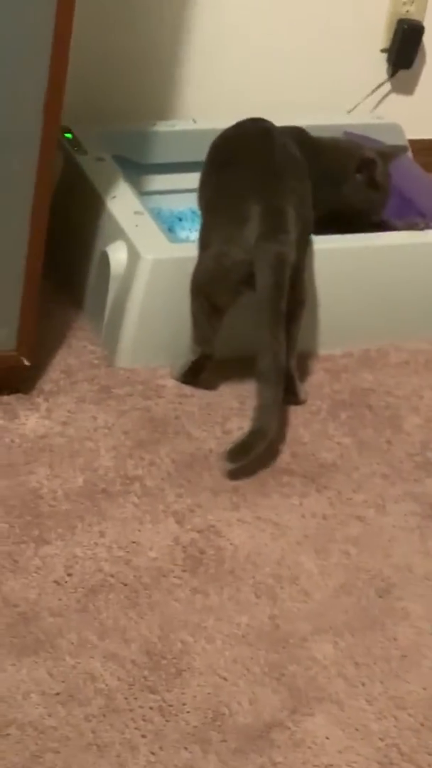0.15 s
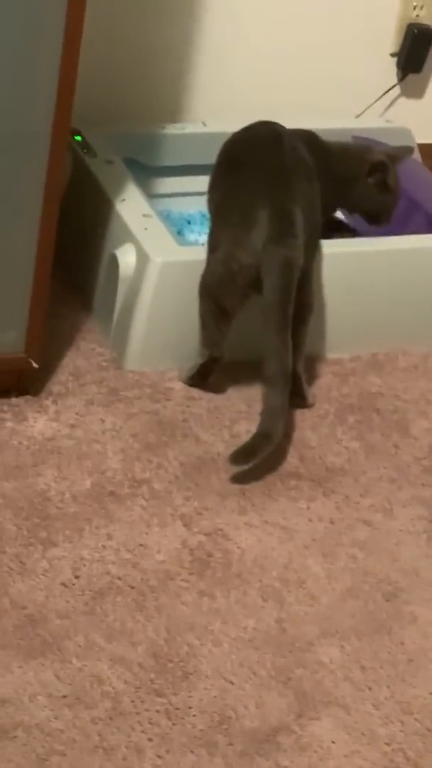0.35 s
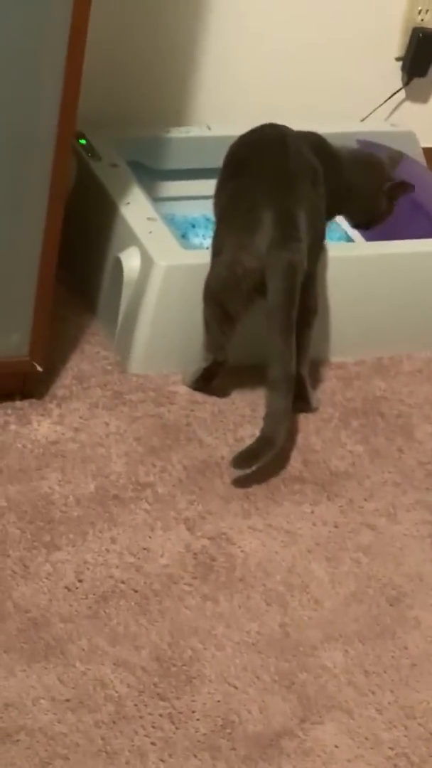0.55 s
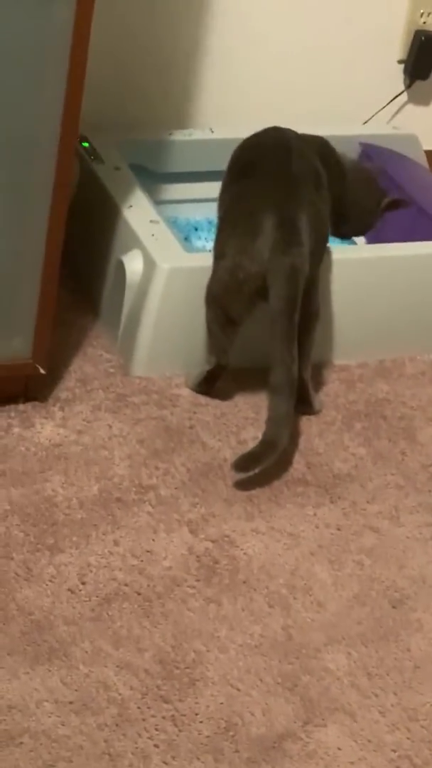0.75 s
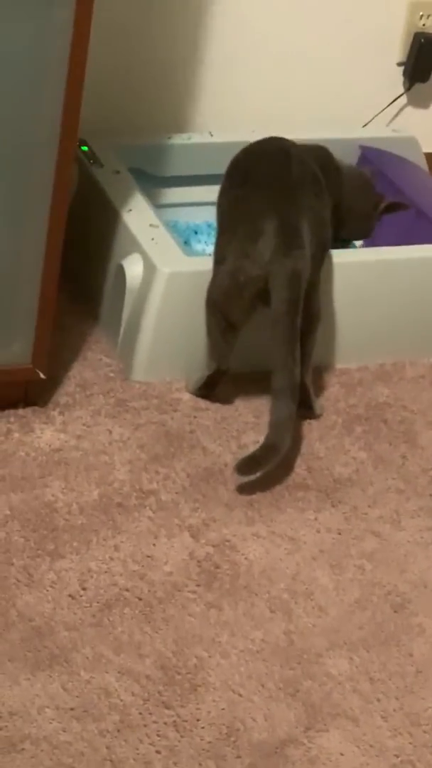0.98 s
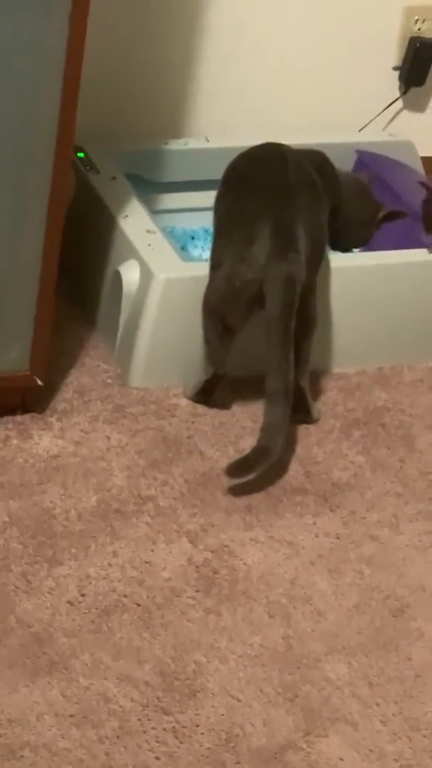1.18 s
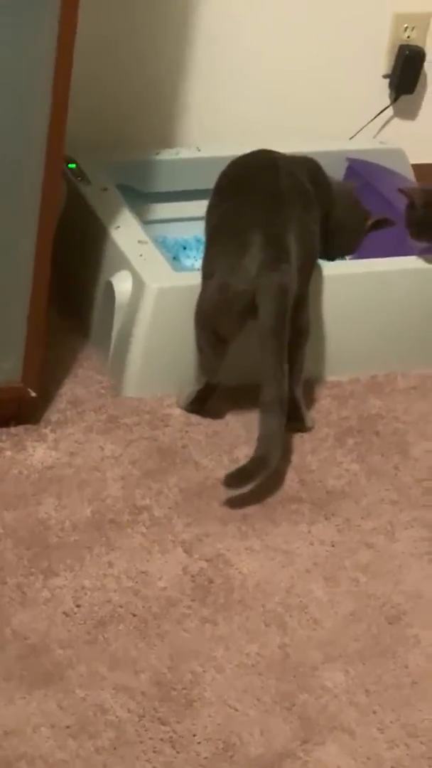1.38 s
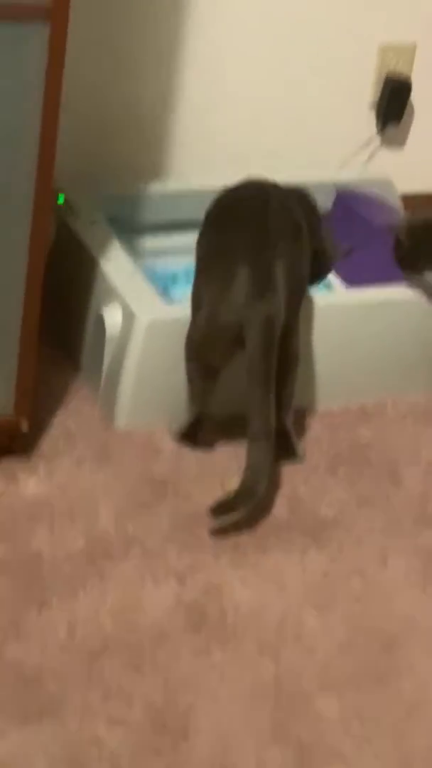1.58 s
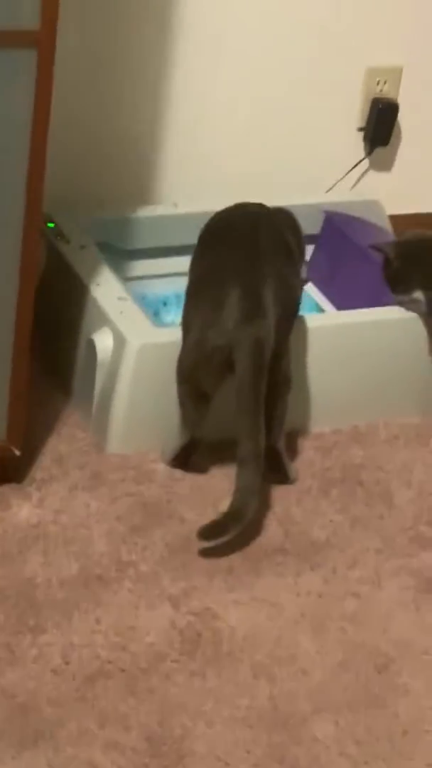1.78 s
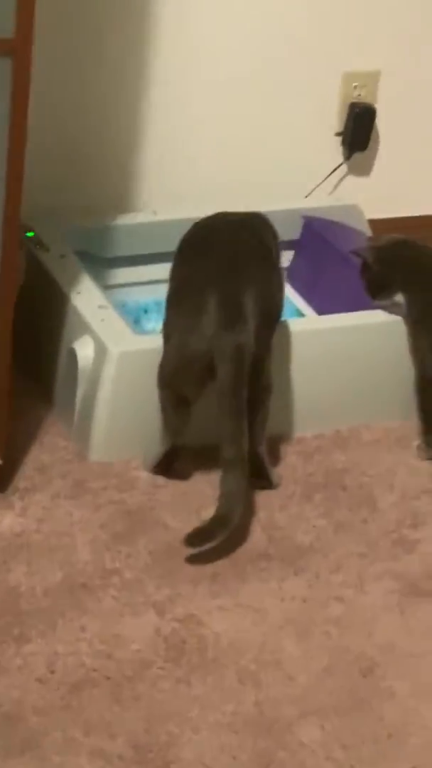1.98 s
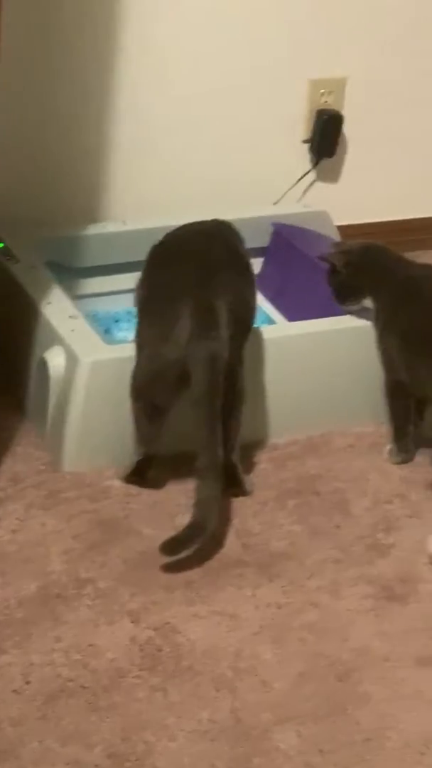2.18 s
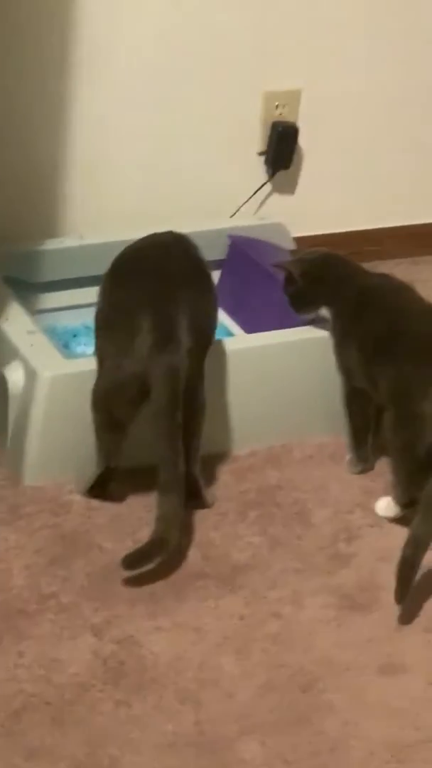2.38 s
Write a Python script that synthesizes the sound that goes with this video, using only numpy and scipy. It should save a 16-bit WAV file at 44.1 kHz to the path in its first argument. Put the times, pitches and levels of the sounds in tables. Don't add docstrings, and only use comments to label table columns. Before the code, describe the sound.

A cat's paw rakes crunchy crystal litter in a plastic tray, two bursts over low appliance hum

```python
import sys
import numpy as np
from scipy import signal
from scipy.fft import rfft, irfft, next_fast_len
from scipy.io import wavfile
from scipy.ndimage import uniform_filter1d

SR = 44100
rng = np.random.default_rng(int(sys.argv[2]) if len(sys.argv) > 2 else 0)


def transcribe(signal):
    frames = np.atleast_2d(signal).T
    limited = np.clip(frames, -1, 1)
    pcm = np.round(limited * 32767).astype(np.int16)
    wavfile.write(sys.argv[1], SR, pcm)


def voltage_ratio(decibels):
    exponent = np.asarray(decibels, float) / 20
    return 10 ** exponent


N = 112014


def evened(x):
    return x / np.sqrt(np.mean(x ** 2) + 1e-20)


def read(points, hz):
    f, value = np.transpose(points)
    return np.interp(np.log(hz + 1), np.log(f + 1), value)


def coloured(x, points):
    hz = np.fft.rfftfreq(x.shape[-1], 1 / SR)
    ended = [(0.0046, -109)] + list(points) + [(SR / 2, -60)]
    return evened(irfft(rfft(x) * voltage_ratio(read(ended, hz)), x.shape[-1]))


def resonate(x, hz, width_hz):
    turn = np.exp(2j * np.pi * np.cumsum(hz * np.ones(N)) / SR)
    r = np.exp(-np.pi * width_hz / SR)
    return 2 * (turn * signal.lfilter([1 - r], [1, -r], x / turn + 1e-18)).real


def resonate_twice(x, hz, width_hz):
    return evened(resonate(resonate(x, hz, width_hz), hz, width_hz))


def stroke(start_s, length_s, release_s):
    t = np.arange(N) / SR - start_s
    rise_s = 0.0024 + 0.28 * length_s
    return np.clip(t / rise_s, 0, 1) * np.exp(-np.maximum(t - length_s, 0) / release_s)


# pitch_hz, level_db, unsteadiness_hz, steady_share
HUM_PARTIALS = [
    (120, 3, 2.2, 0.91),
    (60.9, -13, 12, .2),
    (241, -16, 6.3, .4),
]
# time_s, level_db
HUM_SWELL = [(0.0, -49), (0.05, -51), (0.13, -50.5), (0.54, -51), (0.57, -54.5), (0.79, -47.5),
             (0.84, -52.5), (1.61, -49), (1.65, -67), (1.68, -52.5), (1.85, -48.5), (1.92, -56),
             (2.21, -50), (2.24, -55.5), (2.48, -48.5), (2.54, -55)]


def hum():
    t = np.arange(N) / SR
    tones = np.zeros(N)
    for hz, db, width_hz, steady in HUM_PARTIALS:
        sine = np.sqrt(2) * np.sin(2 * np.pi * hz * t)
        wavering = resonate_twice(rng.standard_normal(N), hz, width_hz)
        tones += voltage_ratio(db) * (steady * sine + (1 - steady) * wavering)
    return voltage_ratio(np.interp(t, *np.transpose(HUM_SWELL))) * tones


# freq_hz, density_db_per_hz
AIR_SPECTRUM = [(150, 1), (300, -2.5), (600, -11.5), (900, -9.5), (1150, -17.5), (1450, -12), (2100, -26),
                (2900, -44)]
# freq_hz, density_db_per_hz
RUMBLE_SPECTRUM = [(22, -36), (36, -14.5), (55, 6.5), (78, 1.5), (100, 5), (160, -1.5), (240, -3.5),
                   (330, -17)]


def air():
    air_db, rumble_db, patchy_db = -62.5, -53, 1.31
    wash = voltage_ratio(air_db) * coloured(rng.standard_normal((2, N + 2048)), AIR_SPECTRUM)
    wash = wash + voltage_ratio(rumble_db) * coloured(rng.standard_normal((2, N + 2048)), RUMBLE_SPECTRUM)
    z = signal.stft(wash, nperseg=1024, noverlap=768)[2]
    patches = uniform_filter1d(rng.standard_normal(z.shape[1:]), size=10, axis=0)
    patches = uniform_filter1d(patches, size=14, axis=1)
    drifting = signal.istft(z * voltage_ratio(patchy_db * evened(patches)), nperseg=1024, noverlap=768)[1]
    return drifting[:, 1024:][:, :N]


# freq_hz, density_db_per_hz
HISS_SPECTRUM = [(1500, -17), (3000, -16), (5000, -15), (7000, 0), (10000, 7), (14000, 5.5), (15600, 5),
                 (16300, -32)]


def hiss():
    hiss_db = -88
    return voltage_ratio(hiss_db) * coloured(rng.standard_normal((2, N)), HISS_SPECTRUM)


def clicks(rate_per_s, spread_db):
    size = voltage_ratio(spread_db * np.minimum(rng.exponential(1, N), 4))
    size = size * rng.choice([-1., 1.], N)
    return evened(size * (rng.random(N) < rate_per_s / SR))


# start_s, drag_s, crunch_db, crunch_centre_hz, tinkle_db
STROKES = [(0.021, 0.011, -54.5, 2220, -53), (0.097, 0.056, -72.5, 2300, -79),
           (.166, 0.0027, -78, 2230, -55), (0.169, 0.027, -55, 2900, -64), (0.214, .04, -51.5, 3330, -76),
           (0.245, 0.012, -68, 3700, -60), (0.257, 0.051, -57, 3570, -74), (0.321, 0.058, -40, 3300, -51),
           (0.366, 0.032, -41, 2520, -55), (.42, 0.035, -53.5, 3400, -84), (1.086, 0.078, -56.5, 1770, -67),
           (1.133, 0.15, -49, 2350, -54.5), (1.23, 0.056, -45, 2320, -52.5),
           (1.289, 0.054, -49.5, 2690, -52), (1.333, 0.056, -56.5, 2270, -59.5),
           (1.413, 0.036, -70.5, 2600, -70.5), (1.47, 0.094, -86, 2600, -81.5),
           (2.065, .01, -85, 5000, -80)]
# pitch_hz, width_hz, level_db
TRAY_WALLS = [(1000, 120, -8), (1500, 160, -6), (2100, 250, -6), (2600, 200, -4), (3200, 300, -1),
              (3850, 250, -2)]
# freq_hz, density_db_per_hz
CRUNCH_SKIRT = [(300, -36), (700, -16.5), (1200, -1.5), (3000, 10.5), (4500, 4), (8000, -11.5)]
# freq_hz, density_db_per_hz
TINKLE_SPECTRUM = [(3000, -30), (5500, -1.5), (9000, -1), (12500, -3), (14500, -5.5), (15600, -7),
                   (16200, -49)]


def litter():
    crunch_per_s, crunch_spread_db = 2500, 2
    tinkle_per_s, tinkle_spread_db = 5000, -8
    width_hz, skirt_db, tray_db = 2010, -2.5, -15
    shapes = np.array([stroke(row[0], row[1], 0.012) ** 2 for row in STROKES])
    crunch_db, centre_hz, tinkle_db = np.transpose(STROKES)[2:]

    power = voltage_ratio(2 * crunch_db) @ shapes + 1e-16
    hz = ((voltage_ratio(2 * crunch_db) * centre_hz) @ shapes + 1e-16 * centre_hz.mean()) / power
    hump = resonate_twice(clicks(crunch_per_s, crunch_spread_db), hz, width_hz)
    skirt = coloured(clicks(crunch_per_s, crunch_spread_db), CRUNCH_SKIRT)
    crunch = np.sqrt(power) * (hump + voltage_ratio(skirt_db) * skirt)

    walls = np.zeros(N)
    for wall_hz, wall_width_hz, db in TRAY_WALLS:
        bandwidth_gain = np.sqrt(width_hz / wall_width_hz)
        walls += voltage_ratio(db) * resonate(crunch, wall_hz, wall_width_hz) * bandwidth_gain

    tinkle = coloured(clicks(tinkle_per_s, tinkle_spread_db), TINKLE_SPECTRUM)
    tinkle = np.sqrt(voltage_ratio(2 * tinkle_db) @ shapes) * tinkle
    return crunch + voltage_ratio(tray_db) * walls + tinkle


# start_s, length_s, level_db, pitch_hz
KNOCKS = [
    (0.022, 0.028, -62.5, 800),
    (0.17, 0.031, -63, 384),
    (1.3, 0.022, -54.5, 550),
    (2.456, 0.022, -71, 210),
    (2.385, .02, -72, 1370),
    (1.585, .03, -62, 233),
]


def knocks():
    out = np.zeros(N)
    for start_s, length_s, db, hz in KNOCKS:
        ring = evened(resonate(rng.standard_normal(N), hz, 140))
        out += voltage_ratio(db) * stroke(start_s, length_s, 0.0081) * ring
    return out


# freq_hz, t60_s
ROOM_T60 = [(500, 1), (1500, 0.34), (4000, 0.29), (10000, 0.25)]


def room(x):
    taps = np.zeros((2, SR // 2))
    at = np.arange(60, SR // 2 - 20, 20)
    at = at + rng.integers(0, 20, (2, len(at)))
    np.put_along_axis(taps, at, rng.choice([-1., 1.], at.shape), 1)
    hz, t, z = signal.stft(taps, SR, nperseg=256)
    decay = voltage_ratio(-60 * t / read(ROOM_T60, hz)[:, None])
    tail = signal.istft(z * decay, SR, nperseg=256)[1]
    return signal.fftconvolve(x[None], tail / np.linalg.norm(tail[0]), axes=1)[:, :N]


# start_s, level_db, ring_hz
TICKS = [(0.0243, -36, 9700), (0.031, -39, 9800), (.166, -44, 12600), (.244, -42, 9000),
         (0.3378, -33, 3200), (.345, -24, 2940), (.3505, -28.5, 3330), (.356, -29.5, 3120),
         (.382, -27, 2600), (0.46, -35, 3550), (1.267, -30, 2300), (1.305, -22, 4050), (1.35, -34, 2430),
         (2.074, -67, 6000), (2.083, -62, 5000)]


def ticks():
    damping_per_cycle = 0.67
    out = np.zeros(N)
    for start_s, db, hz in TICKS:
        cycles = hz * np.maximum(np.arange(N) / SR - start_s, 0)
        envelope = np.minimum(cycles, 1) * np.exp(-damping_per_cycle * cycles)
        out += voltage_ratio(db) * envelope * np.sin(2 * np.pi * cycles)
    return out


# start_s, length_s, level_db, pitch_hz
SQUEAKS = [
    (0.38, 0.06, -47, 2590),
    (.255, .04, -65, 2600),
    (.33, 0.038, -43, 3290),
    (0.29, 0.026, -67.5, 1485),
    (.36, 0.024, -55.5, 1005),
    (1.18, 0.043, -55.5, 1984),
    (1.2, 0.029, -58, 2395),
    (1.312, .052, -50.5, 1840),
]


def claws():
    out = np.zeros(N)
    for start_s, length_s, db, hz in SQUEAKS:
        waver = 1 + 0.011 * evened(uniform_filter1d(rng.standard_normal(N), size=300))
        whistle = np.sqrt(2) * np.sin(2 * np.pi * np.cumsum(hz * waver) / SR)
        out += voltage_ratio(db) * stroke(start_s, length_s, 0.0039) * whistle
    return out


def scene():
    direct_db, room_db, tones_to_room_db = -2, -3, -14
    left_lag_samples = 7
    grains = litter() + ticks()
    tones = claws() + knocks()
    direct = np.array([np.roll(grains, left_lag_samples), grains]) + tones
    wet = voltage_ratio(room_db) * room(grains + voltage_ratio(tones_to_room_db) * tones)
    return voltage_ratio(direct_db) * direct + wet + air() + hum()


# freq_hz, share_0_to_1
PORT_LIKENESS = [(60, 0.9), (130, .96), (300, 0.46), (600, 0.083), (3000, 0.3), (6000, 0.12), (7500, 1),
                 (9000, 1)]
# freq_hz, left_minus_right_db
PORT_BALANCE = [(30, 11), (120, -7.5), (300, 0.5), (500, 1), (2000, -0.56), (6000, -3), (8000, 1.5),
                (16000, 0)]
# freq_hz, phase_rad
PORT_PHASE = [(40, 0.3), (120, -0.26), (400, 0.23), (2500, 1.69), (6000, -0.15)]


def ports(x):
    lag_s = 9.48 / SR
    size = next_fast_len(N + 4096)
    hz = np.fft.rfftfreq(size, 1 / SR)
    left, right = rfft(np.pad(x, ((0, 0), (0, size - N)), "reflect"))
    same = np.clip(read(PORT_LIKENESS, hz), 0, .9999)
    shared = right * np.exp(1j * (read(PORT_PHASE, hz) - 2 * np.pi * hz * lag_s))
    left = (same * shared + np.sqrt(1 - same ** 2) * left) * voltage_ratio(read(PORT_BALANCE, hz))
    return irfft(np.array([left, right]), size)[:, :N]


def band_limit(x):
    return signal.sosfilt(signal.butter(12, 16450, fs=SR, output="sos"), x)


def record(dry):
    fade_s = .006
    ramp = np.clip((N - 1 - np.arange(N)) / (fade_s * SR), 0, 1)
    ending = np.sin(np.pi / 2 * ramp) ** 2
    mix = ports(dry + hiss()) * ending
    return band_limit(mix)


dry = scene()
out = record(dry)
transcribe(out)
```